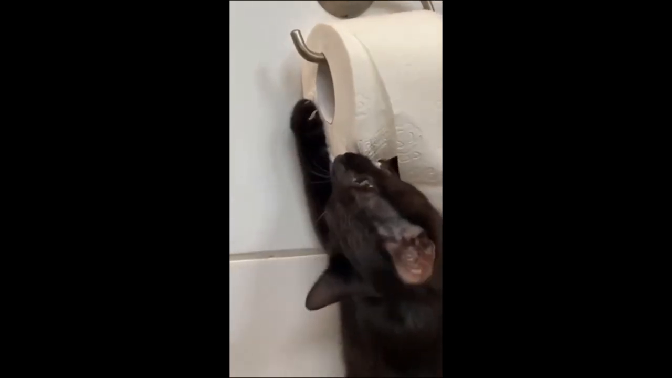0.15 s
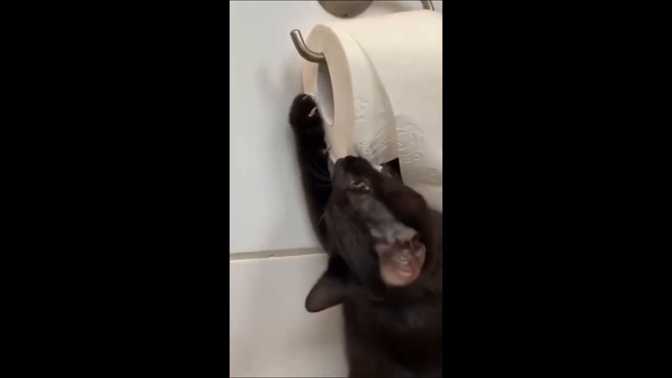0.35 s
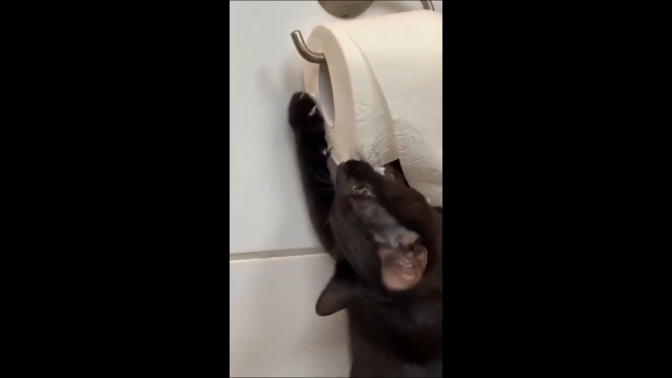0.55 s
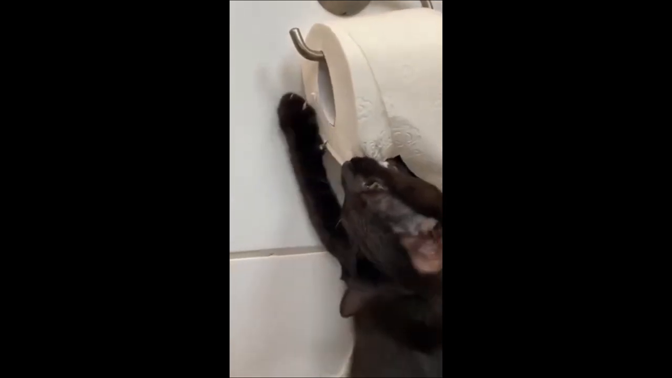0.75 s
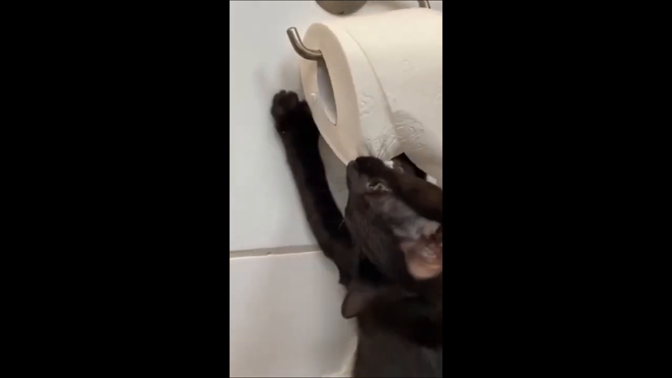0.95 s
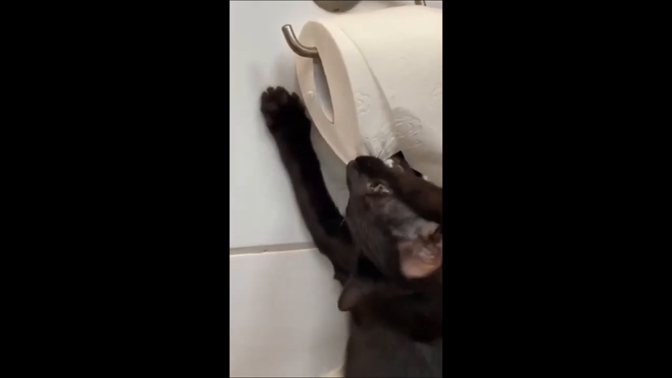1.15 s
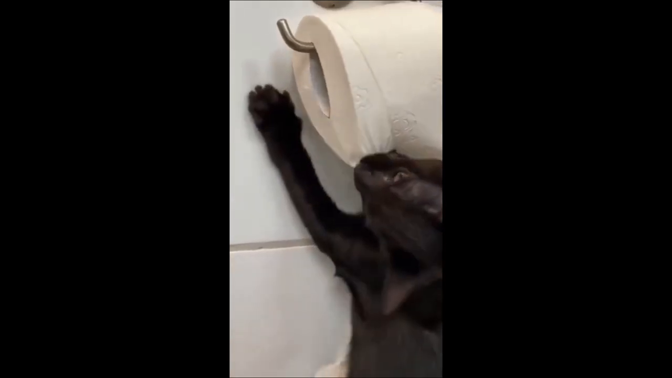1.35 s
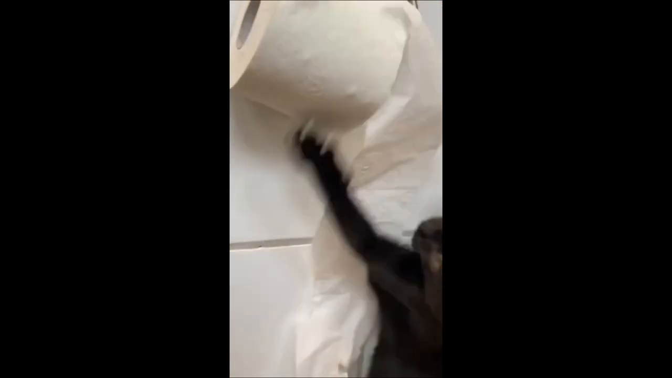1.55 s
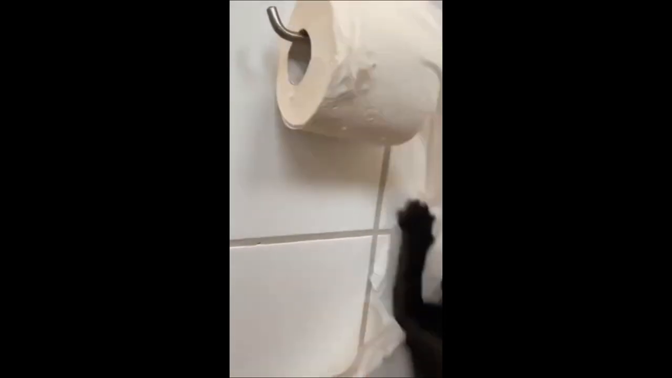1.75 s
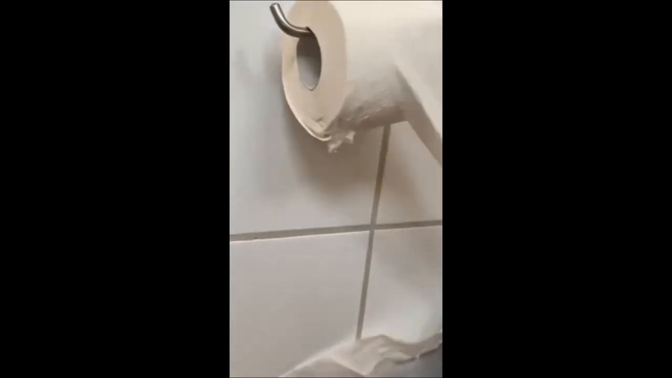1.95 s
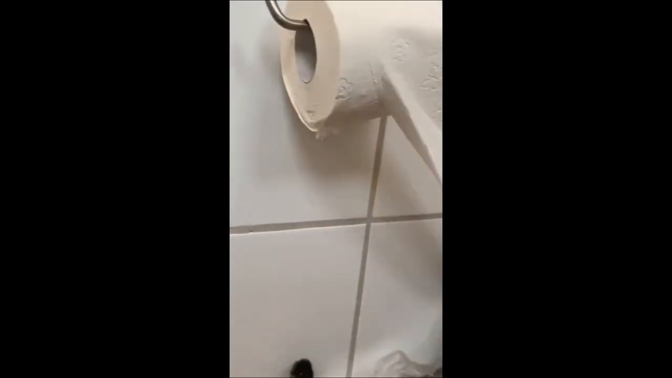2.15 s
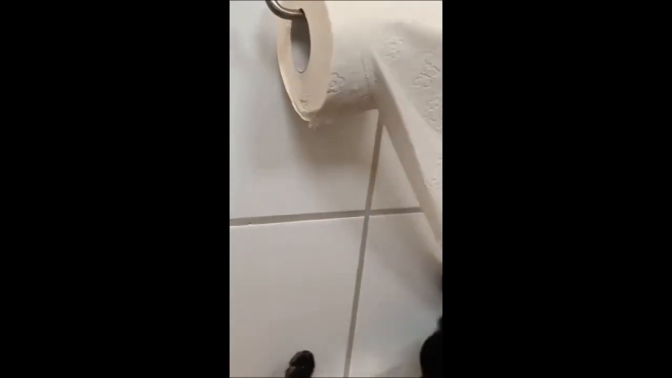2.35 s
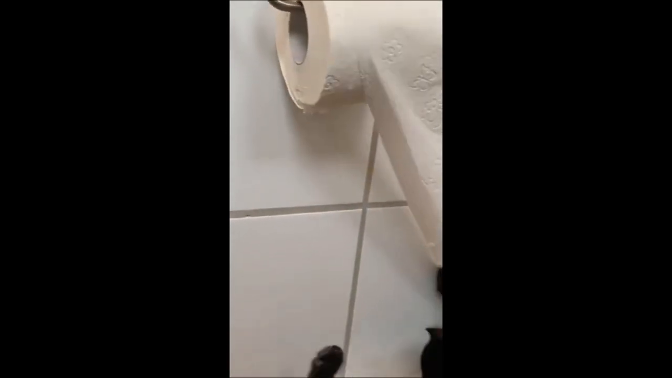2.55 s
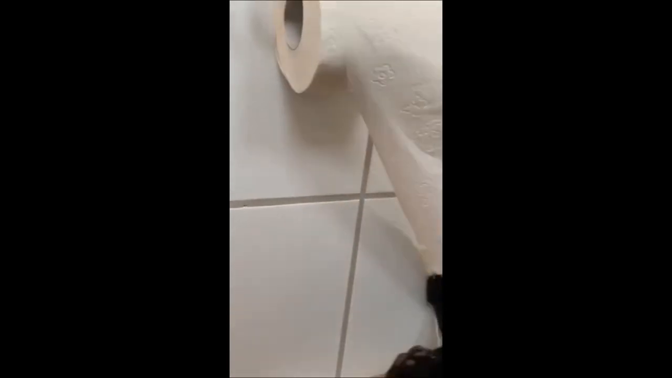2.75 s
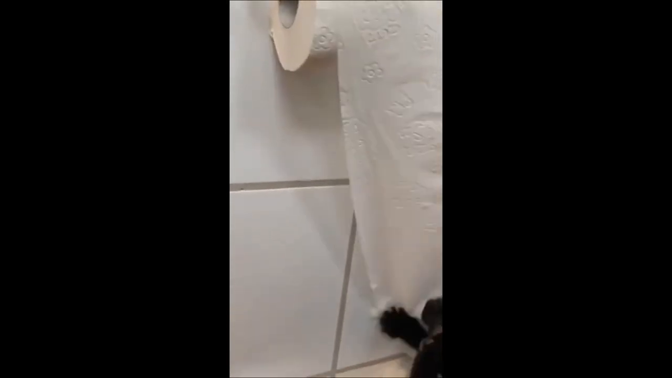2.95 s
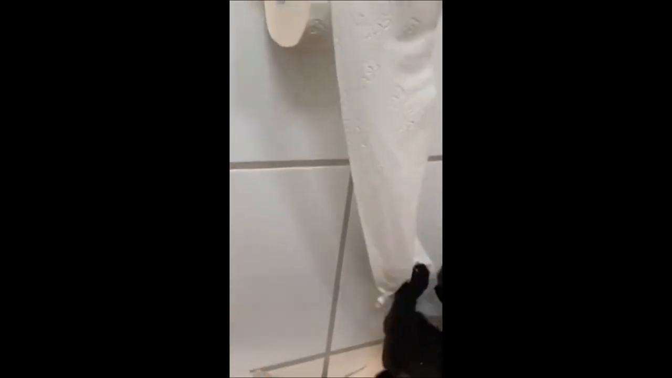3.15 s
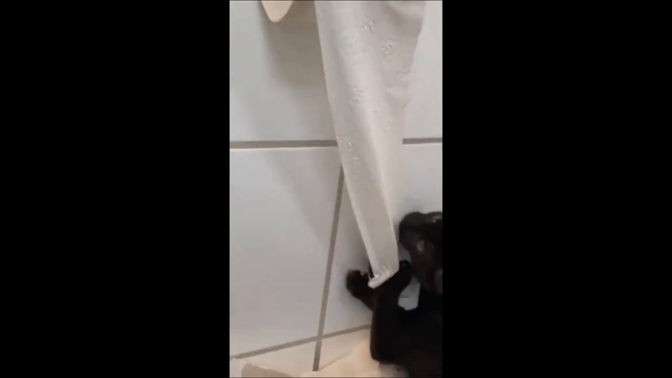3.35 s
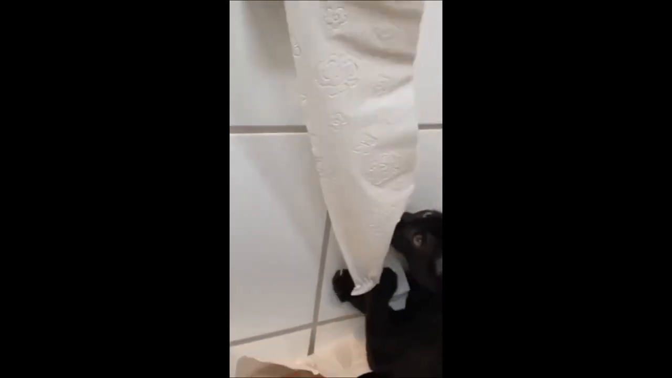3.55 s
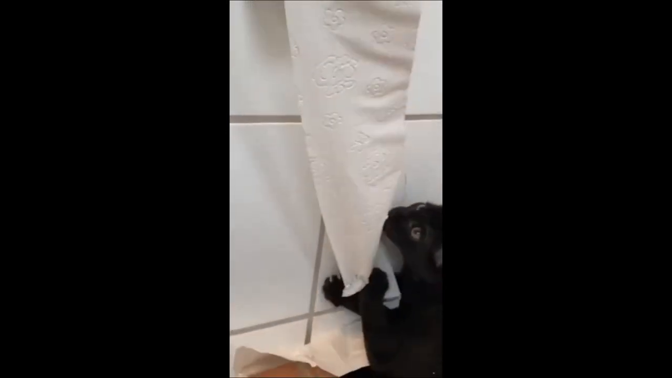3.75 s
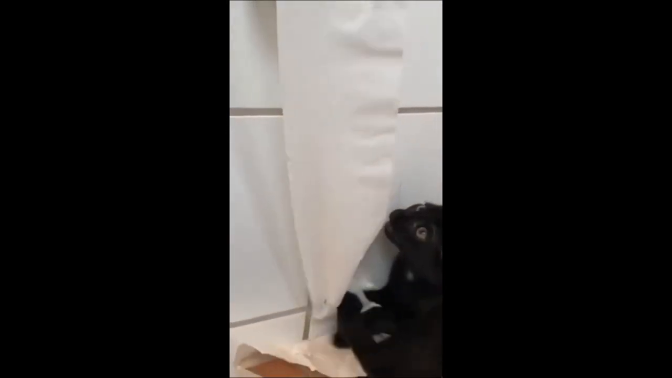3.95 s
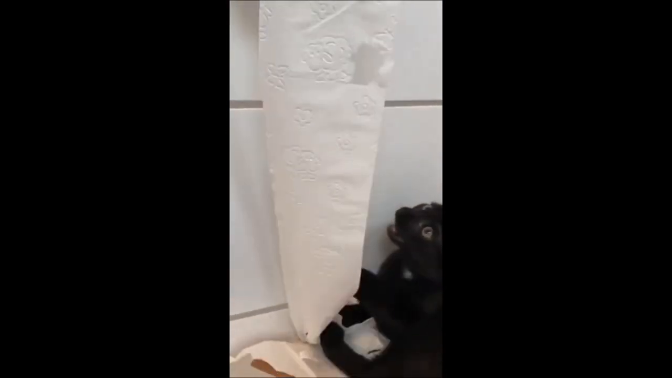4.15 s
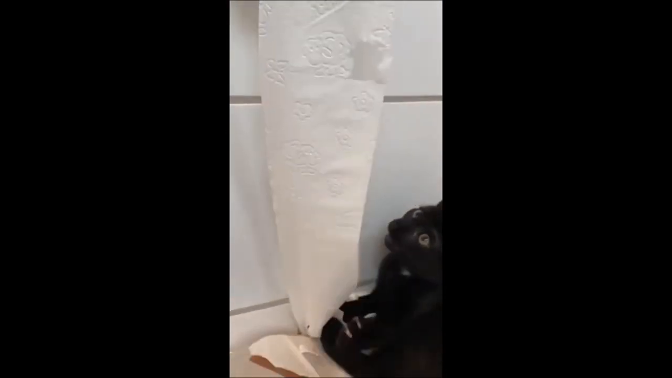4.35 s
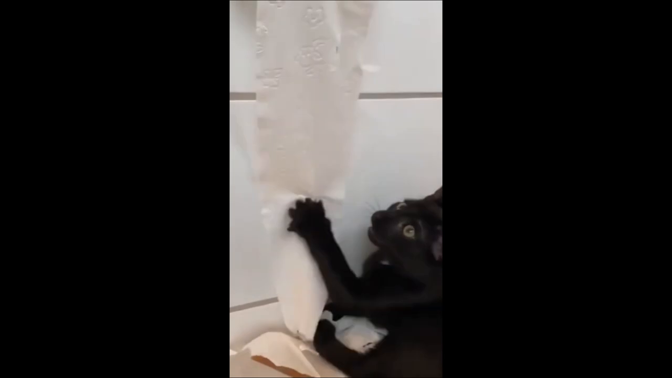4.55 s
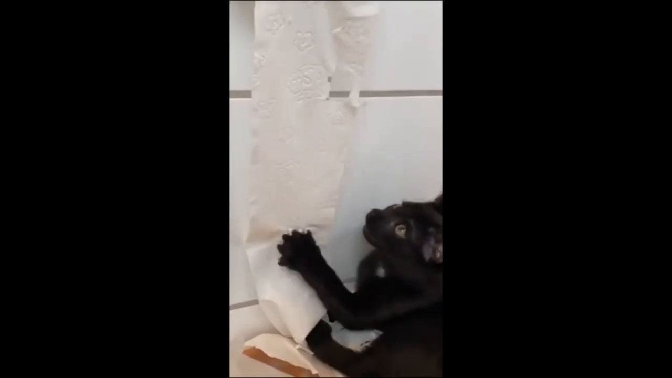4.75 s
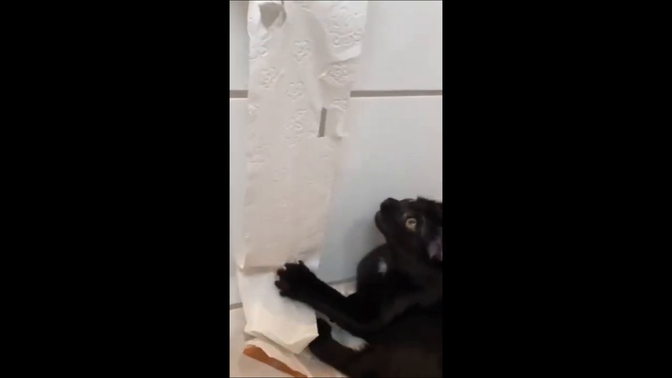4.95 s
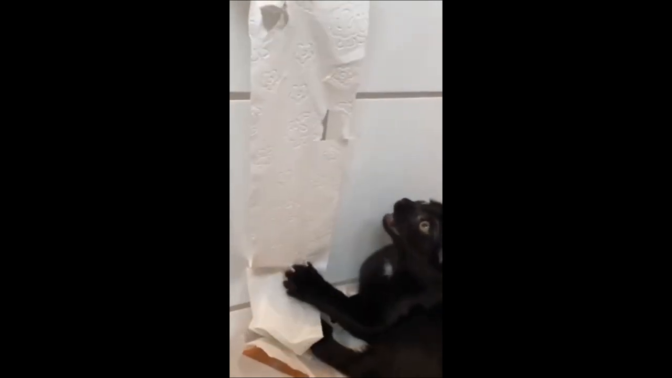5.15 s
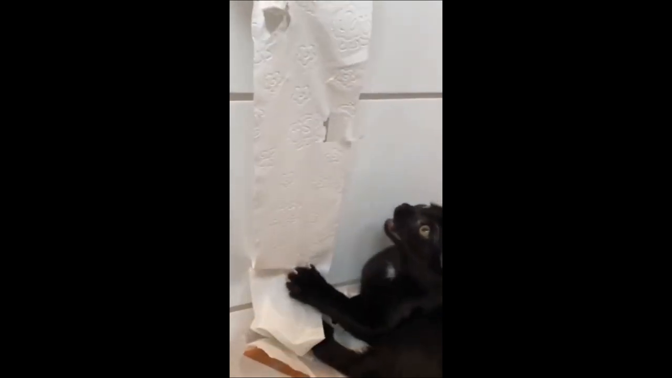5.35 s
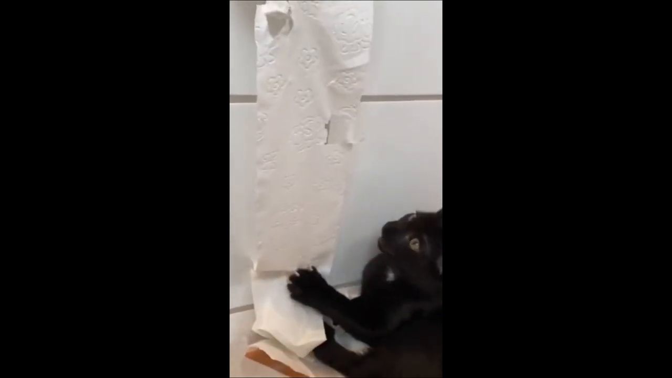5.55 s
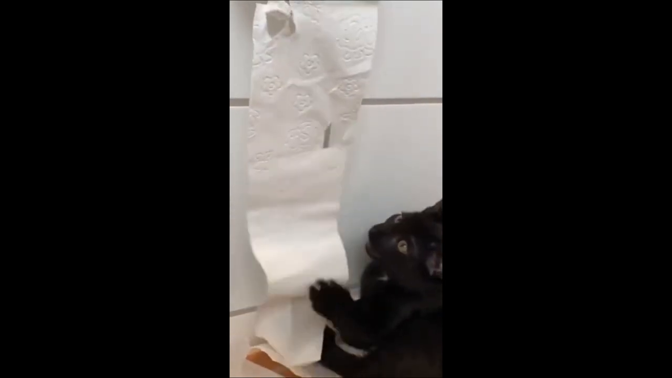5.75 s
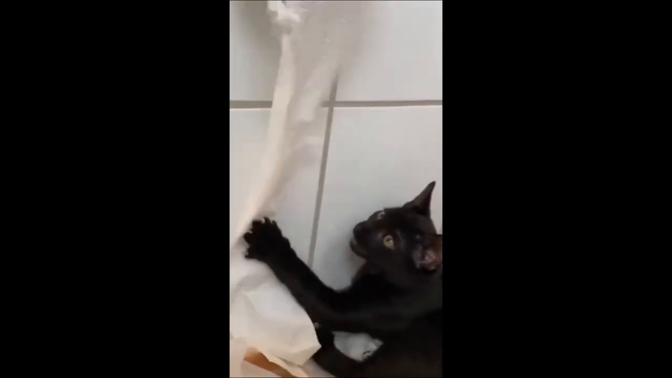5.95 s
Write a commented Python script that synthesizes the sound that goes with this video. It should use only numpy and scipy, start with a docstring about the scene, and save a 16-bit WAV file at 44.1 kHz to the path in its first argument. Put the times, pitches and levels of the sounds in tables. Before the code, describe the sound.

A hollow cardboard roll knocks on its metal holder as tissue rustles, tears and flaps, with soft paw thuds in a small tiled bathroom.

```python
"""Kitten at a paper roll

A kitten claws at a paper roll in a small tiled bathroom, close to a pair of microphones.
The cardboard core knocks on its metal holder: decaying modes excited by a burst of contacts.
The tissue rustles, flaps and crackles as it unrolls: coloured noise, clicks and short rings under envelopes.
Paws thud on the floor as decaying low sines; noise bands give a faint rumble, a boom and still air.
Sparse decaying echoes stand for the tiled walls."""
import sys
import numpy as np
from scipy import signal
from scipy.fft import rfft, irfft
from scipy.io import wavfile
from scipy.ndimage import uniform_filter1d

SR = 44100
rng = np.random.default_rng(int(sys.argv[2]) if len(sys.argv) > 2 else 0)


def output_pcm(signal):
    """Save a mono or channel-first signal as 16-bit PCM at the path in sys.argv[1].

    Samples are clipped to [-1, 1] before scaling.
    """
    pcm = np.clip(np.atleast_2d(signal).T, -1, 1) * 32767
    wavfile.write(sys.argv[1], SR, np.round(pcm).astype(np.int16))


N = 264600

# Core meets holder or claw snaps sheet: [t/s, blow level/dB, struck-spot centre f/Hz, fibre snap re blow/dB]
KNOCKS = [(0.036, -47.5, 586, -18), (0.131, -45.5, 850, -18), (0.187, -32.5, 550, -18),
          (0.263, -56.5, 2540, -10), (0.349, -53.5, 1070, -25), (0.646, -39.5, 1500, -8),
          (0.647, -48.5, 536, -15), (0.79, -28.5, 1110, 2), (0.797, -25.5, 1070, -7), (0.803, -30, 945, 5),
          (0.875, -26.5, 780, -1.5), (0.944, -30, 820, 0.5), (0.955, -30.5, 790, 0.5),
          (0.991, -28.5, 1140, 5), (0.995, -31.5, 790, 4), (1.209, -41, 1340, -7.5),
          (1.298, -40, 1250, 1.5), (1.438, -34, 1190, -20), (1.445, -9, 1130, -15.5), (1.459, -12, 944, -8),
          (1.476, -16, 706, -10), (1.488, -28, 1070, -14), (1.511, -29, 1180, -12), (1.702, -29.5, 990, -9),
          (1.7675, -18, 920, -1), (1.776, -33, 1100, 0), (1.798, -38, 1210, -2.5),
          (1.848, -29, 1220, -20.5), (1.882, -22.5, 857, -10.5), (2.224, -51.5, 1300, -6),
          (2.457, -43.5, 1600, -19), (3.248, -36.5, 690, 0), (3.2803, -30, 1310, 2.5),
          (3.292, -33, 1300, 6), (3.355, -41, 880, -17), (3.402, -40.5, 930, -12), (3.472, -44, 940, 8),
          (3.664, -50, 1350, -0.5), (3.733, -51, 1300, -14), (3.84, -53, 1410, -10), (3.863, -51, 1420, -5),
          (3.894, -45.5, 1420, -8), (3.975, -49, 1300, -3), (4.095, -49, 3200, -9), (4.544, -40, 454, -12),
          (4.572, -32.5, 3200, -15), (5.107, -51.5, 1350, 14)]
# Modes of the cardboard core: [f/Hz, level/dB, t60/s]
CORE_MODES = [(220.5, 0, 0.13), (355.6, -12, 0.068), (490.5, -1.5, 0.037), (580, 1, 0.031),
              (638, -4, 0.045), (890, -2, 0.043), (1069, 5, 0.02), (1300, -5.5, 0.056), (1420, 0, 0.026),
              (1508, -6, 0.024), (1820, 0, 0.015), (2185, -2.5, 0.028), (3250, -1, 0.045)]
# Soft paws and the swinging roll: [t/s, blow level/dB, f/Hz]
THUDS = [(0.184, -42.5, 228), (0.989, -38, 360), (1.001, -47, 217), (1.47, -29, 88), (1.476, -22.5, 234),
         (1.522, -27, 82), (1.6, -34.5, 227), (1.701, -36, 85), (1.757, -24, 93.3), (1.82, -34.5, 84.1),
         (1.896, -30, 247), (1.972, -35.5, 241), (2.0, -45, 71.6), (2.466, -43, 236), (3.197, -26.5, 246),
         (3.216, -32.5, 372), (3.283, -36, 240), (3.228, -38, 70.5), (3.988, -41, 204), (4.549, -33, 239),
         (4.586, -33.5, 94), (4.642, -42.5, 80), (4.901, -53, 106), (5.061, -57, 171), (5.118, -55.5, 194),
         (5.211, -52.5, 108), (5.359, -54, 66.6), (5.523, -57.5, 90.6)]
# How hard the tissue is moved: [t/s, rustle level/dB]
PAPER_MOTION = [(0.0, -70), (0.47, -63), (0.65, -57), (0.95, -84.5), (1.25, -60), (1.5, -64), (1.85, -44.5),
                (2.1, -58.5), (2.52, -66.5), (2.85, -57.5), (3.09, -62), (3.36, -52.5), (3.66, -62),
                (4.03, -57.5), (4.23, -76), (4.69, -64.5), (4.87, -64), (5.0, -63.5), (5.19, -71),
                (5.27, -86), (5.72, -95.5), (5.92, -70), (6.0, -65.5)]
# How the kitten moves: [t/s, floor rumble level/dB]
KITTEN_MOTION = [(0.0, -64.5), (0.72, -72.5), (0.92, -65), (1.38, -63.5), (1.65, -51.5), (1.82, -47),
                 (2.07, -60.5), (2.6, -62.5), (3.46, -60), (3.69, -68), (4.63, -61.5), (5.56, -74.5),
                 (6.0, -64.5)]
# Relative spectral density of the fibre rustle: [f/Hz, level per Hz/dB]
RUSTLE_SPECTRUM = [(1180, -34), (2000, -7), (4250, -5), (4950, -13.5), (5580, -6), (6550, -8.5),
                   (7750, -4.5), (11100, -5.5), (12600, -17.5), (13600, -44.5)]
# Relative spectral density of the flapping sheet: [f/Hz, level per Hz/dB]
FLAP_SPECTRUM = [(350, -3.5), (600, 2.5), (950, 1), (1400, -0.5), (2200, -5.5), (3200, -12), (5000, -36.5)]
# Relative spectral density of the booming roll: [f/Hz, level per Hz/dB]
BOOM_SPECTRUM = [(110, -36), (170, -4.5), (235, 3), (330, 2), (430, -4), (800, -25)]
# Relative spectral density of the floor rumble: [f/Hz, level per Hz/dB]
RUMBLE_SPECTRUM = [(15, -36), (30, -12), (45, 4.5), (60, 6), (85, 3.5), (110, -9), (180, -47.5)]
# Relative spectral density of still air: [f/Hz, level per Hz/dB]
AIR_SPECTRUM = [(88, -43), (150, -16.5), (278, -13), (322, -1.5), (565, -29.5), (618, -12.5), (769, -23.5),
                (11500, -42), (15000, -69)]
# Likeness of left and right in diffuse noise: [f/Hz, correlation/1]
LIKENESS = [(60, 1), (250, 0.79), (600, 0.55), (1300, 0.25), (4000, 0.05), (12000, 0.16)]
# Level difference of the microphone pair: [f/Hz, left re right level/dB]
PAIR_LEAN = [(60, -1), (110, -0.5), (200, -6), (360, -5.5), (660, 1.5), (1200, 4), (2180, -1), (3960, 0)]
# Reverberation time of the tiled room: [f/Hz, t60/s]
TILES_T60 = [(100, 0.4), (500, 0.29), (1500, 0.23), (4000, 0.29), (10000, 0.065)]
# Fibres tear in a burst: [peak t/s, peak level/dB, rise time/s, fall time/s, sheet flap re tear/dB]
TEARS = [(0.1338, -59.5, 0.0055, 0.024, -3.5), (0.1935, -46, 0.0054, 0.015, -8.5),
         (0.793, -45.5, 0.0061, 0.044, -1), (0.902, -49.5, 0.0058, 0.046, -5),
         (0.991, -54, 0.0025, 0.16, 3), (1.076, -56, 0.0029, 0.02, -4), (1.4613, -32.5, 0.0071, 0.012, 7),
         (1.49, -43.5, .015, 0.09, 6), (1.53, -52, .01, 0.017, 0), (1.61, -59, 0.019, 0.014, 5),
         (1.673, -35.5, 0.0032, 0.01, -2.5), (1.701, -37.5, 0.00066, 0.019, -4),
         (1.754, -45, 0.00086, 0.013, 11), (1.77, -34.5, 0.00093, 0.043, 3),
         (1.862, -40.5, 0.0047, 0.014, -23), (1.883, -32, 0.0008, 0.039, -5),
         (1.957, -51, 0.014, 0.037, 1.5), (1.977, -46, 0.013, 0.0069, -3), (2.0, -62, .003, 0.012, 8),
         (2.46, -51, 0.015, 0.034, -1.5), (2.728, -56.5, 0.023, 0.014, -30),
         (3.006, -59, 0.0026, 0.031, -8), (3.038, -52, 0.013, 0.015, -1), (3.193, -42.5, 0.0043, 0.022, 0),
         (3.211, -45.5, 0.014, 0.03, 3.5), (3.282, -40, 0.00073, 0.025, -17.5),
         (3.469, -54.5, 0.0043, 0.032, 0.5), (4.045, -55.5, 0.05, 0.072, 0),
         (4.101, -51, 0.016, 0.065, -2.5), (4.552, -44.5, 0.0062, 0.013, -5),
         (4.575, -37.5, 0.0083, 0.0085, -5.5), (4.603, -52.5, 0.017, 0.052, 2.5),
         (4.98, -61.5, 0.019, 0.011, -1), (5.049, -68, 0.00084, 0.011, -1),
         (5.081, -52, 0.0071, 0.0097, -14), (5.108, -52.5, 0.0037, 0.022, -12.5),
         (5.7917, -61, 0.015, 0.077, -8.5), (5.8333, -62.5, 0.016, 0.017, 0.5)]
# Filter that colours the fibre snap: [f/Hz, gain/dB]
SNAP_FILTER = [(900, -28.5), (1800, -9), (3000, 2), (5500, -8.5), (9000, -4.5), (13000, -28.5)]

AIR_DB = -82.5
EDGE_HZ = 13450  # upper band limit
ROOM_DB = -6.5  # echo of the knocks
RATTLE_S, FIRM_DB = 0.0036, -17  # decay time of the contacts after a blow; level of a firm blow
CONTACT_SHARE = 0.87  # dB that the main contact loses per dB of a blow below firm
THUD_T60_S, THUD_DAMPING = 0.12, 0.78  # t60 at 100 Hz; it shrinks as pitch to the power of the damping
CALM_DB = -61  # rustle or rumble level that counts as calm
FLAP_DB, FLAP_SHARE = -64.5, 0.67  # flap at a calm rustle, and its share of the rustle's swings in dB
BOOM_DB, BOOM_SHARE = -63, 1.43  # boom at a calm rumble, and its share of the rumble's swings in dB
CRINKLES_PER_S, CRINKLE_DB, CRINKLE_T60_S = 64, -11.5, 0.02  # crinkle level is relative to the flap
PORT_TURN, PORT_HZ, PORT_OCTAVES = 1.5, 640, 0.6  # left leads by this many radians around this pitch
SHEEN_HZ, SHEEN_DB = 6800, 4.5  # the treble above this pitch flickers by this much either way


def gain_of(db):
    """Definition of level: decibels to an amplitude factor."""
    return 10 ** (np.asarray(db) / 20)


def evened(x):
    """Normalisation of power: scales to rms 1."""
    return x / np.sqrt(np.mean(x ** 2) + 1e-20)


def read(points, hz):
    """Logarithmic pitch scale: interpolates a table over log frequency."""
    f, value = np.transpose(points)
    return np.interp(np.log(hz + 1), np.log(f + 1), value)


def follow(rows, axis):
    """Linear interpolation: one column of a curve at every sample."""
    rows = np.array(rows)
    return np.interp(np.arange(N) / SR, rows[:, 0], rows[:, axis])


def add(mix, s, sound):
    """Superposition: adds a sound into the mix, in place, from a time in seconds."""
    part = mix[:, round(s * SR):][:, :sound.shape[1]]
    part += sound[:, :part.shape[1]]


def filtered(x, spectrum):
    """Linear filtering: multiplies the spectrum by a gain curve in dB."""
    return irfft(rfft(x) * gain_of(read(spectrum, np.fft.rfftfreq(N, 1 / SR))), N)


def hiss(spectrum, patchy_db, size=512):
    """Partial coherence: two noise channels alike by band, with drifting patches of colour, rms 1."""
    frames, hz = 4 * N // size + 5, np.fft.rfftfreq(size, 1 / SR)
    a, b, c, d, patches = rng.standard_normal((frames, len(hz), 5)).T
    patches = uniform_filter1d(patches, size=18, axis=0)  # over frequency
    patches = evened(uniform_filter1d(patches, size=9, axis=1))  # over time
    same = np.clip(read(LIKENESS, hz), -1, 1)[:, None]
    left = a + 1j * b
    right = same * left + np.sqrt(1 - same ** 2) * (c + 1j * d)
    bins = np.array([left, right]) * gain_of(patchy_db * patches)
    noise = signal.istft(bins, nperseg=size, noverlap=size * 3 // 4)[1][:, :N]
    return evened(filtered(noise, spectrum))


def clumps(depth_db, length_s):
    """Relaxation of random slips: a level that swells at each slip and dies away, rms 1."""
    slips = (rng.random(N) < 0.5 / (length_s * SR)) * rng.exponential(1, N)
    trail = signal.lfilter([1], [1, -np.exp(-1 / (length_s * SR))], slips)
    trail = uniform_filter1d(trail, size=round(length_s * SR))
    return evened(gain_of(depth_db * np.minimum(trail, 4)))


def still_air():
    """Stationary noise: a faint coloured hiss of constant overall level."""
    return gain_of(AIR_DB) * hiss(AIR_SPECTRUM, patchy_db=3.5)


def rumble(stir_db):
    """Amplitude modulation: low floor noise follows the kitten's motion and random slips."""
    noise = hiss(RUMBLE_SPECTRUM, patchy_db=1, size=4096)
    return noise * clumps(depth_db=3, length_s=0.05) * gain_of(stir_db)


def boom(stir_db):
    """Expanded dynamics: the roll's boom swings further in dB than the rumble it follows."""
    noise = hiss(BOOM_SPECTRUM, patchy_db=2.5, size=2048)
    level_db = BOOM_DB + BOOM_SHARE * (stir_db - CALM_DB)
    return noise * clumps(depth_db=2.5, length_s=0.03) * gain_of(level_db)


def flicker(length_s):
    """Saturated random drift: a level that swings between brighter and duller spells, rms 1."""
    size = round(length_s * SR)
    drift = uniform_filter1d(rng.standard_normal(N), size=size)
    drift = evened(uniform_filter1d(drift, size=size))
    return evened(gain_of(SHEEN_DB * np.tanh(2 * drift)))


def fibre_fizz():
    """Shot noise: sparse crackle clicks join a steady fibre hiss, and the treble flickers."""
    sizes = gain_of(3.0 * np.minimum(rng.exponential(1, N), 5))
    clicks = sizes * (rng.random(N) < 4000 / SR) * rng.choice([-1, 1], N)  # about 4000 per second
    crackle = evened(filtered(np.array([clicks, clicks]), RUSTLE_SPECTRUM))
    fizz = 0.75 * hiss(RUSTLE_SPECTRUM, patchy_db=3.5, size=512) + 0.22 * crackle
    hz = np.fft.rfftfreq(N, 1 / SR)
    sheen = irfft(rfft(fizz) / (1 + (SHEEN_HZ / (hz + 1)) ** 20), N)
    return fizz + sheen * (flicker(length_s=0.014) - 1)


def crinkles():
    """Impulse excitation: creases pop at random, each a short ring at one of eight pitches, rms 1."""
    t, out = np.arange(2000) / SR, np.zeros(N)
    pops = gain_of(4.0 * np.minimum(rng.exponential(1, N), 4)) * (rng.random(N) < CRINKLES_PER_S / SR)
    kind = rng.integers(0, 8, N)
    for k, hz in enumerate(np.geomspace(600, 2600, num=8)):
        ring = gain_of(-60 * t / CRINKLE_T60_S) * np.sin(2 * np.pi * hz * t)
        out += signal.oaconvolve(pops * (kind == k), ring)[:N]
    return evened(np.array([out, out]))


def paper():
    """Envelope control: fibre fizz, sheet flap and crinkles follow slow motion; slips and tears join in."""
    motion_db = follow(PAPER_MOTION, axis=1)[None]
    slips = clumps(depth_db=2.0, length_s=0.008)
    rustle = gain_of(motion_db) * slips
    loose = gain_of(FLAP_DB + FLAP_SHARE * (motion_db - CALM_DB))
    slack = loose * slips
    add_tears(rustle, slack)
    flap = slack * hiss(FLAP_SPECTRUM, patchy_db=1.0, size=256)
    return rustle * fibre_fizz() + flap + loose * gain_of(CRINKLE_DB) * crinkles()


def knock(db, hz, snap_db):
    """Modal excitation: a blow and short rattle ring core modes near the struck spot; fibres snap with it."""
    t = np.arange(6000) / SR
    short = t[:2000]
    shifts, contact = rng.standard_normal(len(CORE_MODES)), rng.standard_normal((3, 2000))
    ring = np.zeros(len(t))
    for shift, (f, mode_db, t60) in zip(shifts, CORE_MODES):
        reach_db = -11.0 * np.log2(f / hz) ** 2  # modes far from the spot's pitch are hardly driven
        # the loose core shifts its modes a little each time
        mode = np.sin(2 * np.pi * f * (1 + 0.045 * shift) * t)
        ring += gain_of(mode_db + reach_db - 60 * t / t60) * mode
    ring *= 1 - np.exp(-t / 0.0005)  # the padded core takes the blow softly
    rattle = 0.048 * contact[0] * np.exp(-short / RATTLE_S) * (1 - np.exp(-short / 0.0015))
    rattle[40] = gain_of(CONTACT_SHARE * min(db - FIRM_DB, 0))  # main contact, fainter in a light blow
    body = signal.fftconvolve(ring, rattle)[:len(t)]
    body = gain_of(db) * np.array([body, body]) / abs(body).max()
    # the snap is a few milliseconds of noise, partly shared by both ports
    snap = gain_of(snap_db) * (contact[1] + 0.25 * contact[1:])
    snap *= np.exp(-short / 0.0028) * (1 - np.exp(-short / 0.00067))
    return body, gain_of(db) * snap


def all_knocks():
    """Superposition: the ringing bodies of all blows, with their filtered fibre snaps."""
    bodies, snaps = np.zeros((2, 2, N))
    for s, *row in KNOCKS:
        body, snap = knock(*row)
        add(bodies, s, body)
        add(snaps, s, snap)
    return bodies + filtered(snaps, SNAP_FILTER)


def bathroom(x):
    """Reverberation: sparse echoes of random sign, other ones per channel, each band with its own decay."""
    taps = np.zeros((2, SR // 2))
    at = np.arange(160, SR // 2 - 20, 20)
    at = at + rng.integers(0, 20, (2, len(at)))
    np.put_along_axis(taps, at, rng.choice([-1., 1.], at.shape), 1)
    hz, t, bins = signal.stft(taps, SR, nperseg=256)
    decay = gain_of(-60 * t / read(TILES_T60, hz)[:, None])
    tail = signal.istft(bins * decay, SR, nperseg=256)[1]
    tail = tail / np.linalg.norm(tail[0])
    return signal.fftconvolve(x.mean(0)[None], tail, axes=1)[:, :N]


def alternating_echoes(x):
    """Time-variant reverberation: three random echo sets take turns, which keeps the tail smooth in colour."""
    turn = 2 * np.pi * np.arange(N) / SR / 0.13  # one turn in 0.13 s
    return sum(bathroom(x * np.sqrt(2 / 3) * np.cos(turn + k * np.pi / 3)) for k in range(3))


def add_tears(rustle, slack):
    """Exponential growth and decay: each burst of tearing fibres raises the rustle and flap levels."""
    lead_s = 0.05  # the burst starts this long before its peak
    t = np.arange(10000)[None] / SR - lead_s
    for s, db, rise_s, fall_s, flap_db in TEARS:
        tear = gain_of(db) * np.exp(np.minimum(t / rise_s, -t / fall_s))
        add(rustle, s - lead_s, tear)
        add(slack, s - lead_s, tear * gain_of(flap_db))


def thud(db, hz):
    """Damped oscillation: a soft push starts a low swing and a weaker, lower one that die fast."""
    t = np.arange(10000) / SR
    swing = np.sin(2 * np.pi * hz * t) + 0.071 * np.sin(2 * np.pi * 0.7 * hz * t)
    t60 = THUD_T60_S * (100 / hz) ** THUD_DAMPING
    push = gain_of(db - 60 * t / t60) * swing * (1 - np.exp(-t / 0.0012))
    return np.tile(push, (2, 1))


def all_thuds():
    """Superposition: every soft push at its own time."""
    thuds = np.zeros((2, N))
    for s, *row in THUDS:
        add(thuds, s, thud(*row))
    return thuds


def thud_echo(thuds):
    """Low-frequency coherence: long waves reach both ports nearly alike."""
    echo = bathroom(thuds)
    return 0.4 * echo[0] + 0.04 * echo


def scene():
    """Superposition: blows ring in the room over the paper, the rumble and still air."""
    stir_db = follow(KITTEN_MOTION, axis=1)
    background = still_air() + rumble(stir_db) + boom(stir_db)
    tissue = paper()
    knocks = all_knocks()
    thuds = all_thuds()
    echo = gain_of(ROOM_DB) * alternating_echoes(knocks) + thud_echo(thuds)
    return background + tissue + knocks + thuds + echo


def record(dry):
    """Two-port reception: level and phase differ by pitch; deep bass and top treble are cut."""
    hz = np.fft.rfftfreq(N, 1 / SR)
    lean_db = read(PAIR_LEAN, hz) / 2  # half up on the left, half down on the right
    # the right port hears all but the treble 3 samples later, and the low middle turned
    late = np.exp(-2j * np.pi * hz * 3 / SR / (1 + (hz / 5000) ** 6))
    octaves = np.log2((hz + 1) / PORT_HZ)
    late = late * np.exp(-1j * PORT_TURN * np.exp(-(octaves / PORT_OCTAVES) ** 2))
    bass_cut = 1 + (40 / (hz + 1)) ** 4
    ports = irfft(rfft(dry) * gain_of([lean_db, -lean_db]) * [late ** 0, late] / bass_cut, N)
    band_limit = signal.firwin(511, EDGE_HZ, window=("kaiser", 9), fs=SR)
    return signal.oaconvolve(ports, band_limit[None], "same")


dry = scene()
out = record(dry)
output_pcm(out)
```